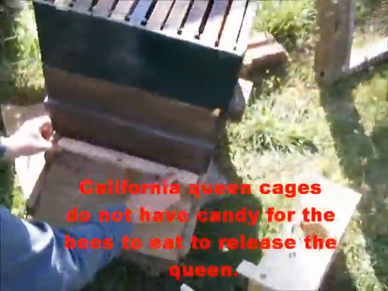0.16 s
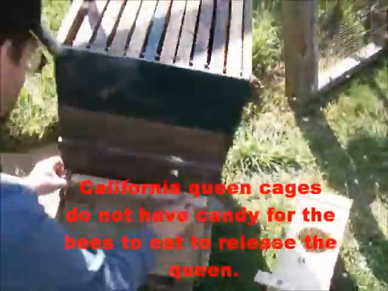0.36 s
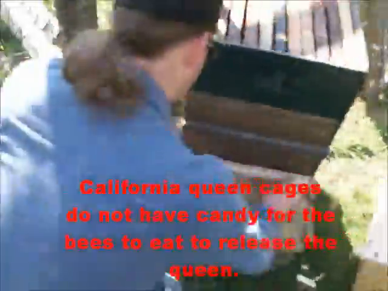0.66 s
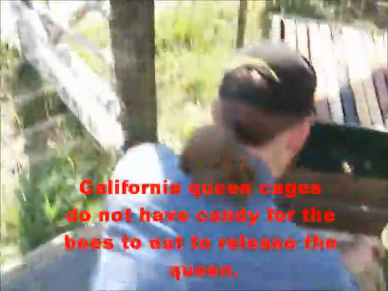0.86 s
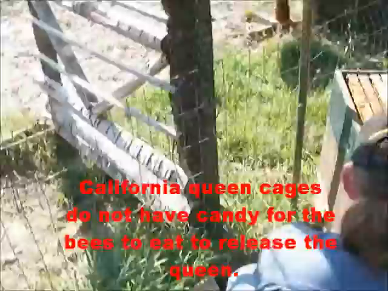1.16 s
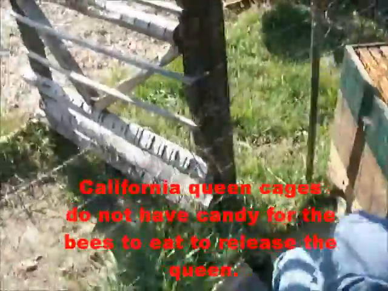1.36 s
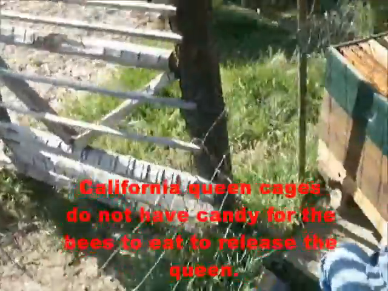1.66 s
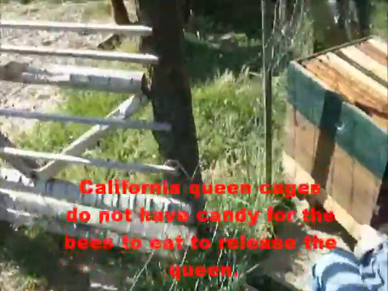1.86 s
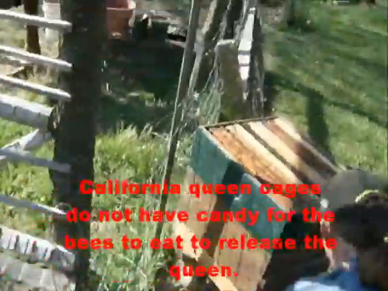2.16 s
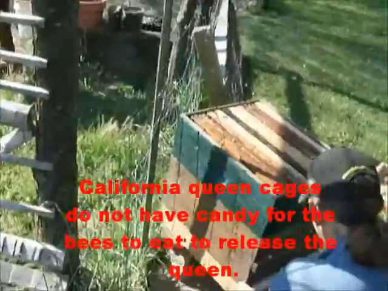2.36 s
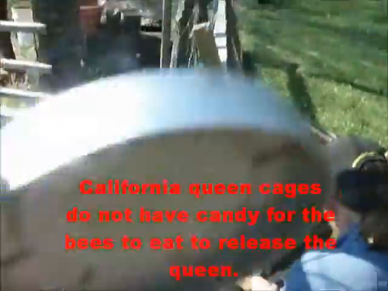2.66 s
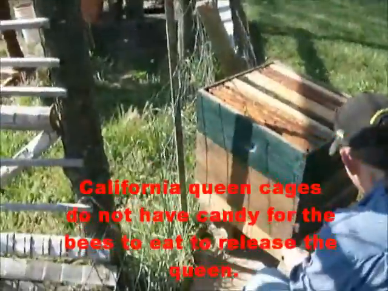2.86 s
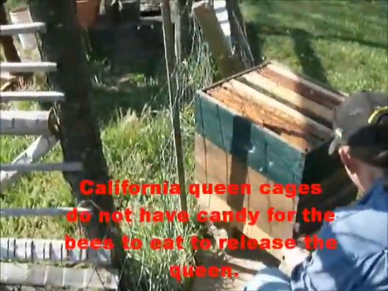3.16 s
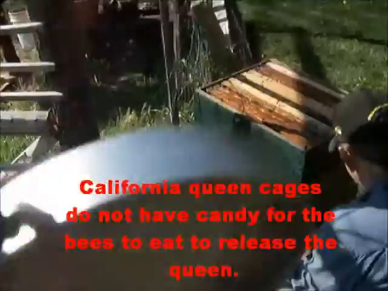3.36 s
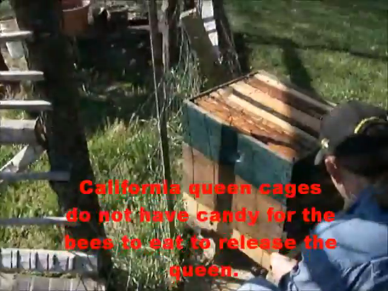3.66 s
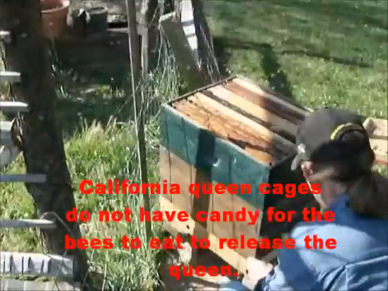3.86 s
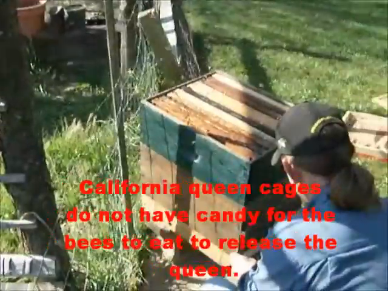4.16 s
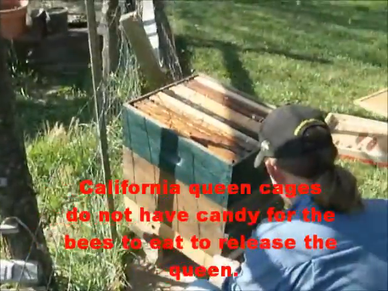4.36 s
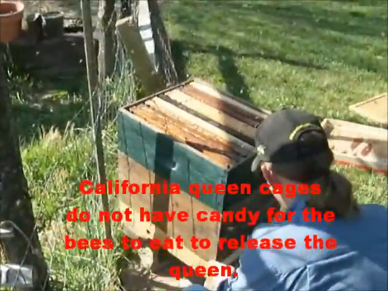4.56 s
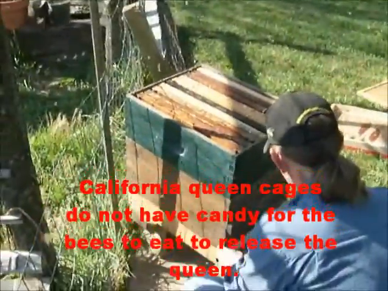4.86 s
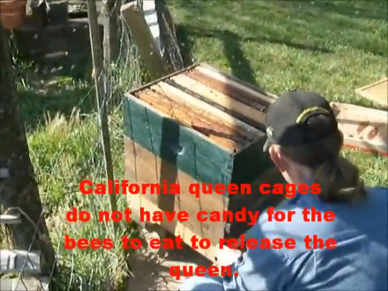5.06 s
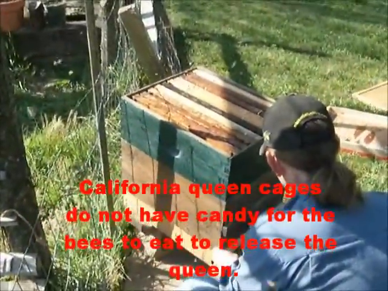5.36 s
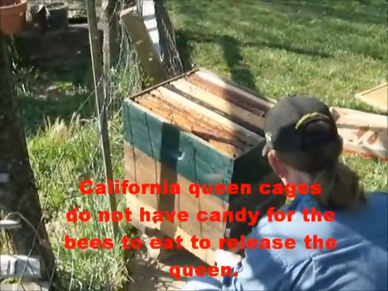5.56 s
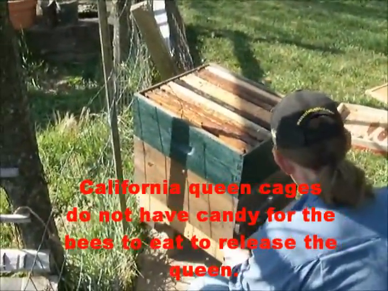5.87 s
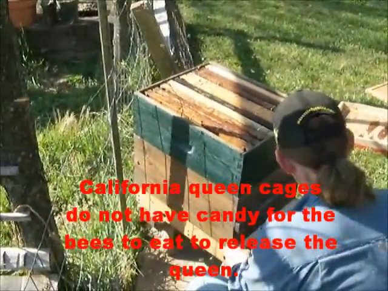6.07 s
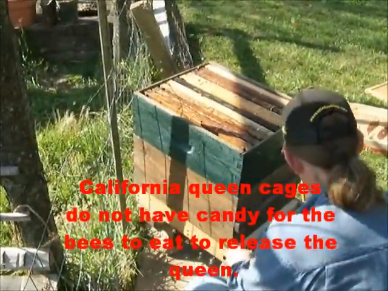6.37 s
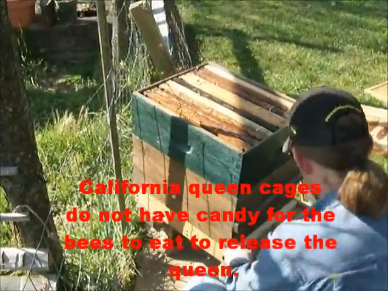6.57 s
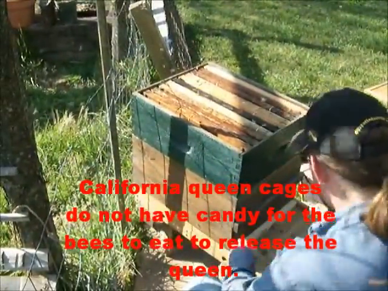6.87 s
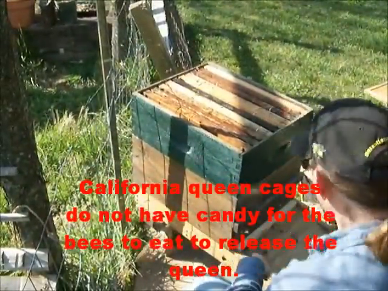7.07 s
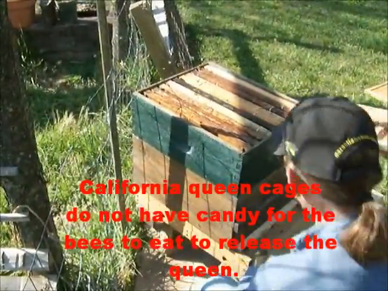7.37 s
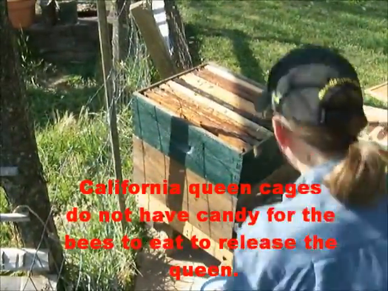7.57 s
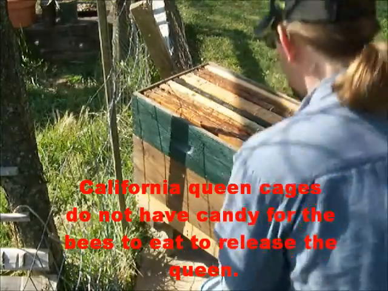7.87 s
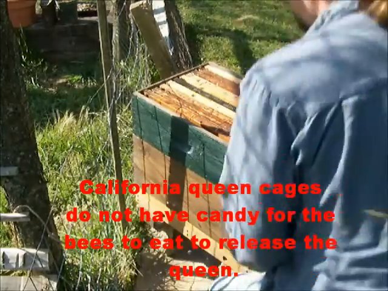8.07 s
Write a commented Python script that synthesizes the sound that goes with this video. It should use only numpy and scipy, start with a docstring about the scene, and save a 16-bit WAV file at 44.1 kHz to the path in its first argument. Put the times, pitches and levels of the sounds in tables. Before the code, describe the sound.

Close handling of a wooden beehive outdoors: a few soft taps, a hoarse board squeak, then hard hollow knocks, clicks and short scrapes in uneven bursts. Bees hum continuously around it, ducking under the recorder's automatic gain and swelling back once the knocking stops. Wind rumbles at the microphones, distant birds whistle and chirp, small hoarse pips sound on the left, and a low engine throbs far away.

```python
"""Open beehive at work

Many wingbeats blend into one drone at a wooden hive in a garden, with a far engine and far birds.
Struck parts ring damped modes, scrapes are gated noise, tones are glides, air and hiss are shaped noise.
The narrow-band recorder hisses on the right; its gain control ducks the hum after loud knocks."""
import sys
import numpy as np
from scipy import signal
from scipy.fft import rfft, irfft
from scipy.io import wavfile

SR = 44100
rng = np.random.default_rng(int(sys.argv[2]) if len(sys.argv) > 2 else 0)


def to_wav(s):
    """Save 16-bit WAV."""
    ch = np.atleast_2d(s).T  # columns
    pcm = np.round(np.clip(ch, -1, 1) * 32767)  # PCM
    wavfile.write(sys.argv[1], SR, pcm.astype(np.int16))


N = 362943
TIME = np.arange(N) / SR


def undb(db):
    """Decibels to gain."""
    return 10 ** (np.asarray(db) / 20)


def unit(x):
    """Scale to rms 1."""
    return x / np.sqrt(np.mean(x ** 2) + 1e-18)


def level_curve(table):
    """Gain at every sample from a table of (start_s, level_db)."""
    s, db = np.transpose(table)
    return undb(np.interp(TIME, s, db))


def walk(rate_hz):
    """Smooth random motion with a spread near 1."""
    knots = rng.standard_normal(int(N / SR * rate_hz) + 3)
    return 1.2 * np.interp(TIME * rate_hz + rng.random(), np.arange(len(knots)), knots)


def noise(colour, size=N, tilt_db=0):
    """Noise with a spectrum of (freq_hz, level_db) points, tilted per octave about 1.5 kHz."""
    hz, db = np.transpose(colour)
    f = np.maximum(np.fft.rfftfreq(size, 1 / SR), 1)
    shape_db = np.interp(np.log(f), np.log(hz), db) + tilt_db * np.log2(f / 1500)
    spectrum = rfft(rng.standard_normal(size)) * undb(shape_db) * (f < 2 * hz[-1])
    return unit(irfft(spectrum, size))


def stereo_noise(colour, size=N, tilt_db=0):
    """Independent noise at each microphone."""
    return np.array([noise(colour, size, tilt_db) for _ in range(2)])


def pan(db):
    """Equal-power left and right gains for a left minus right level."""
    return unit(undb(np.array([[db], [-db]]) / 2))


def add(out, s, sound):
    """Mix a sound in at a time."""
    i = max(int(s * SR), 0)
    out[:, i:i + sound.shape[-1]] += sound[..., :N - i]


def late(x, ms):
    """Delay a sound."""
    return np.interp(TIME - ms / 1000, TIME, x)


# hiss spectrum: freq_hz, level_db
HISS_COLOUR = [(200, -22), (900, -9.5), (2000, -9), (3100, -3), (3900, -4.5), (4600, -2), (5100, 2),
               (5600, -1), (6400, -7), (7400, -14.5), (9000, -32.5)]


def hiss():
    """Microphone self-noise, almost all on the right."""
    return noise(HISS_COLOUR) * undb(4.5) * pan(-35.5)


# outdoor murmur spectrum: freq_hz, level_db
GARDEN_COLOUR = [(40, -6.5), (130, 0.5), (300, -1), (480, 1.5), (640, -7.5), (1100, -7.5), (1400, -9.5),
                 (1900, -20), (3000, -22.5), (4000, -24), (7500, -29)]


def garden():
    """Grass and far insects; part is diffuse, part reaches the right microphone first."""
    shared = noise(GARDEN_COLOUR)
    diffuse = stereo_noise(GARDEN_COLOUR)
    murmur = np.array([late(shared, 0.18), shared]) + diffuse
    return unit(murmur) * undb(3.0 + 0.11 * walk(28.0))


# far engine: start_s, level_db (before the common background gain)
ENGINE_LEVEL = [(0, 2), (5, -7.5), (5.8, 9), (7.1, 10.5), (7.7, 6.5), (8.23, 0.5)]
# exhaust orders: multiple of the firing rate, level_db
EXHAUST_ORDERS = [(1, -6), (2, -16.5), (3, 1.5), (4, -2), (5, -8.5), (6, -17.5)]
FIRING_HZ = 30.5


def engine(wander_rad=0.72):
    """Low exhaust orders of a slow far engine, each wavering in level and phase on its way."""
    phase = 2 * np.pi * np.cumsum(FIRING_HZ * (1 + 0.011 * walk(12))) / SR
    throb = np.zeros(N)
    for multiple, db in EXHAUST_ORDERS:
        gain = undb(db + 3.5 * walk(9.7))
        offset = wander_rad * walk(25) + 2 * np.pi * rng.random()
        throb += gain * np.sin(multiple * phase + offset)
    return unit(np.array([late(throb, 0.81), throb])) * level_curve(ENGINE_LEVEL) * pan(3.3)


# air rumble at the ports: freq_hz, level_db
BUFFET_COLOUR = [(12, 2), (25, 4), (70, -3), (120, -7.5), (200, -19), (400, -41), (1000, -39.5)]
# gusts above the breeze: start_s, length_s, rise_db, left_minus_right_db
GUSTS = [(0.166, 0.86, 9.5, -7), (2.028, 0.86, 12, -6), (2.99, 3.04, 4, -2), (5.103, 2.02, 6.5, 5.5)]
BREEZE_DB = -27.5


def buffet(gust_edges=0.62):
    """Air rumbles independently at each microphone port and swells in gusts."""
    swell_db = np.zeros((2, N))
    for s, length_s, rise_db, side_db in GUSTS:
        ears_db = rise_db + np.array([[side_db], [-side_db]]) / 2
        add(swell_db, s, ears_db * signal.windows.tukey(int(length_s * SR), gust_edges))
    rumble = np.array([noise(BUFFET_COLOUR) * undb(2.2 * walk(7.4)) for _ in range(2)])
    return rumble * undb(BREEZE_DB + swell_db)


# hand friction spectrum: freq_hz, level_db
RUB_COLOUR = [(30, -23.5), (75, -14.5), (135, -1.5), (190, -12), (260, -14), (600, -24), (1500, -51.5)]
# hand shifting on the camera: start_s, length_s, level_db
RUBS = [(0.226, 0.18, -23.5), (7.5, 0.43, -30)]


def hand_rubs():
    """Skin friction on the camera body, mostly by the left microphone."""
    out = np.zeros((2, N))
    for s, length_s, db in RUBS:
        n = int(length_s * SR)
        rub = stereo_noise(RUB_COLOUR, n) * signal.windows.tukey(n, .5)
        add(out, s, rub * undb(db) * pan(17.0))
    return out


def tone(length_s, start_hz, end_hz, tremble, flutter_db):
    """A soft-edged glide that trembles in pitch and level."""
    n = int(length_s * SR)
    hz = np.linspace(start_hz, end_hz, n) * (1 + tremble * walk(200)[:n])
    wave = np.sin(2 * np.pi * np.cumsum(hz) / SR)
    return unit(wave * signal.windows.tukey(n, .7) * undb(flutter_db * walk(60)[:n]))


# far birds: start_s, length_s, start_hz, end_hz, level_db
WHISTLES = [(1.23, 0.1, 3190, 3000, -41.5), (1.8, 0.22, 3370, 3428, -37), (2.238, 0.11, 3290, 3260, -36),
            (2.44, 0.15, 3200, 3180, -39), (2.64, 0.13, 3150, 3100, -35.5), (2.91, 0.075, 3060, 3110, -40),
            (3.0, 0.11, 3020, 3120, -40), (3.14, 0.05, 3040, 3080, -39.5), (5.86, 0.24, 2780, 2830, -42.5),
            (6.3, 1.25, 3835, 3880, -45.5), (7.06, 0.13, 7350, 6600, -44), (7.325, 0.098, 3400, 4140, -40),
            (7.754, 0.13, 3160, 2940, -37), (7.849, 0.133, 2990, 2860, -43)]


def bird_whistles():
    """Thin gliding whistles of far birds on the right."""
    out = np.zeros((2, N))
    for s, length_s, start_hz, end_hz, db in WHISTLES:
        whistle = tone(length_s, start_hz, end_hz, tremble=.003, flutter_db=2.0)
        add(out, s, whistle * undb(db) * pan(-29.0))
    return out


# far bird: start_s, centre_hz, level_db
CHIRPS = [(3.6, 3750, -37.5), (3.664, 3720, -36), (3.68, 4430, -40.5), (3.73, 3740, -36),
          (3.799, 3780, -41), (3.882, 4450, -37.5), (3.943, 3730, -40)]


def bird_chirps(length_s=0.032, fall=0.04):
    """Quick notes of a far bird on the right, each gliding down."""
    out = np.zeros((2, N))
    for s, hz, db in CHIRPS:
        note = tone(length_s, hz * (1 + fall), hz * (1 - fall), tremble=.006, flutter_db=-1)
        add(out, s, note * undb(db) * pan(-20))
    return out


# short pips: start_s, level_db
PIPS = [(0.02, -41), (0.2, -34.5), (0.472, -41), (0.527, -38), (0.629, -37.5), (1.236, -36), (1.29, -30.5),
        (1.331, -34), (1.571, -34), (1.623, -34), (1.66, -36.5), (1.713, -36.5), (1.757, -36),
        (1.902, -40.5), (1.938, -35), (2.006, -30), (2.265, -32), (2.646, -35)]
PIP_S, PIP_HZ = 0.028, 1376


def hoarse_pips():
    """Quick runs of level-pitched pips on the left, made hoarse by pitch tremble."""
    out = np.zeros((2, N))
    for s, db in PIPS:
        pip = tone(PIP_S, PIP_HZ, PIP_HZ, tremble=0.021, flutter_db=2)
        add(out, s, pip * undb(db) * pan(13.0))
    return out


def bees(wing_hz, spread, harmonics, waver, swell_db, count):
    """Each bee has its own wingbeat, which wavers as it turns; it swells as it comes near."""
    cycle = np.arange(1024) / 1024
    out = np.zeros((2, N))
    for rank in np.linspace(-1, 1, count):
        wave = sum(undb(db) * np.sin(2 * np.pi * (multiple * cycle + rng.random()))
                   for multiple, db in harmonics)
        hz = wing_hz * (1 + spread * rank + waver * walk(4) + 0.005976 * walk(30))
        phase = np.cumsum(hz) / SR
        near = undb(swell_db * walk(1.806))
        # bearing sets the delay between the microphones
        lag_s = .00025 + .00025 * rng.standard_normal()
        for ear, turns in zip(out, (phase - lag_s * hz, phase)):
            ear += near * wave[(turns * len(cycle)).astype(int) % len(cycle)]
    return unit(out)


# whole swarm: start_s, level_db (added to the group gains)
SWARM_LEVEL = [(0, 0), (1.3, 1.5), (4.4, 2), (6.5, 3), (7.5, 1.5), (8.23, 3)]
# flying wingbeat: harmonic multiple, level_db
FLIGHT_HARMONICS = [(1, -3.5), (2, -3.5), (3, -11), (4, -11.5), (5, -13), (6, -20.5), (7, -26.5),
                    (8, -22.5), (9, -36.5), (10, -31.5), (11, -25.5), (12, -33)]
# fanning wingbeat: harmonic multiple, level_db
FANNING_HARMONICS = [(1, -12), (2, 2.5), (3, -1.5), (4, -15.5), (5, -10.5), (6, -4), (7, -10.5)]


def swarm():
    """Circling bees hold pitch better, darting ones bend it more; slower bees fan on the frames."""
    circling = bees(249.2, spread=.037, harmonics=FLIGHT_HARMONICS, waver=.029, swell_db=3.5, count=18)
    darting = bees(248.1, spread=.05, harmonics=FLIGHT_HARMONICS, waver=.05, swell_db=6, count=4)
    fanning = bees(170.7, spread=.07, harmonics=FANNING_HARMONICS, waver=.03, swell_db=4.5, count=8)
    hum = undb(0.37) * circling + undb(-6.0) * darting + undb(-4.0) * fanning
    return hum * level_curve(SWARM_LEVEL)


# single bees: nearest_s, near_time_s, wingbeat_hz, level_db (before the distance gain)
FLYBYS = [(7.37, 0.09, 245, -37.5), (7.98, 0.16, 243.4, -39)]


def flybys(doppler=0.012):
    """A passing bee swells as one over its distance; its pitch sags as it leaves."""
    out = np.zeros((2, N))
    for s, near_s, hz, db in FLYBYS:
        along = (TIME - s) / near_s
        distance = np.hypot(1, along)
        heard_hz = hz * (1 - doppler * along / distance)
        bee = bees(heard_hz, spread=0, harmonics=FLIGHT_HARMONICS, waver=.015, swell_db=1.5, count=1)
        out += bee * undb(db) / distance
    return out


# sliding board: start_s, length_s, lowest_hz, rise_fraction, level_db
SQUEAK = (0.86, 0.095, 720, 0.2, -33.5)


def squeak():
    """A sliding board sings hoarsely; pitch rises and falls with the speed of the push."""
    s, length_s, hz, rise, db = SQUEAK
    n = int(length_s * SR)
    speed = np.sin(np.pi * np.arange(n) / n)
    pitch_hz = hz * (1 + rise * speed + .06 * walk(500)[:n])
    wave = np.sin(2 * np.pi * np.cumsum(pitch_hz) / SR)
    out = np.zeros((2, N))
    add(out, s, unit(wave * np.sqrt(speed) * undb(2.6 * walk(150)[:n])) * undb(db))
    return out


# wood friction spectrum: freq_hz, level_db
SCRAPE_COLOUR = [(150, -26), (500, -4), (850, -1), (1450, 5), (1900, -4.5), (3500, -5.5), (5200, 1),
                 (7500, -10)]
# wood on wood: start_s, length_s, level_db, tilt_db_per_octave
SCRAPES = [(0.823, 0.14, -25.5, -3.5), (2.294, 0.068, -16, -6), (2.476, 0.06, -6.5, -6.5),
           (2.554, 0.056, -17.5, -5), (3.104, 0.039, -7.5, 1), (3.185, 0.028, -23.5, 4.5),
           (3.862, 0.12, -21.5, -5.5), (4.613, 0.0307, -13, -6.5), (5.121, 0.093, -27.5, -2.5),
           (5.439, 0.092, -26, -2.5), (5.568, 0.07, -15, -5), (5.67, 0.026, -25, 2)]


def scrapes(rough_db=2.5):
    """Wood catches and slips in a quick uneven run that builds until the part seats."""
    out = np.zeros((2, N))
    slips = undb(rough_db * walk(400))
    for s, length_s, db, tilt_db in SCRAPES:
        n, i = int(length_s * SR), int(s * SR)
        grain = stereo_noise(SCRAPE_COLOUR, n, tilt_db) * slips[i:i + n]
        build = np.linspace(.35, 1, n) * signal.windows.tukey(n, .12)
        # brighter scrapes lean right
        add(out, s, unit(grain * build) * undb(db) * pan(-tilt_db))
    return out


def blow_level(sound):
    """Scale to the energy of rms 1 over 20 ms."""
    return unit(sound) * np.sqrt(SR / 50 / sound.shape[-1])


def ring(push, modes, age_s, lag_cycles=0.26, uneven_db=3.0):
    """A push rings damped modes, which shift a little from one push to the next."""
    response = np.zeros((2, len(age_s)))
    for k, (hz, t60_s, db) in enumerate(modes):
        # heavily damped modes shift the most
        pitch_hz = hz + .5 * rng.standard_normal() / t60_s
        # each mode reaches the microphones unevenly and out of step
        since_s = np.maximum(age_s - np.array([[lag_cycles / hz], [0]]), 0)
        gain = undb(db + uneven_db * rng.standard_normal((2, 1)) - 60 * since_s / t60_s)
        response += (-1) ** k * gain * np.sin(2 * np.pi * pitch_hz * since_s)
    return blow_level(signal.fftconvolve(push[None], response, axes=1)[:, :len(age_s)])


# recorder filter rings near its cut-off after hard clicks: start_s, level_db
FILTER_RINGS = [(2.355, -13.5), (2.431, -17), (3.136, -23), (4.007, -23), (4.602, -20)]
# filter ring: freq_hz, t60_s, level_db
FILTER_RING_MODES = [(7420, 0.036, 0)]


def filter_rings():
    """The recorder's band limit rings briefly after a hard click, as one damped mode."""
    out = np.zeros((2, N))
    age_s = np.arange(SR // 6) / SR
    for s, db in FILTER_RINGS:
        add(out, s, ring(np.ones(1), FILTER_RING_MODES, age_s) * undb(db) * pan(-10))
    return out


# hive board modes: freq_hz, t60_s, level_db
BOARD_MODES = [(830, 0.021, 0), (1005, 0.013, 2.5), (1268, 0.026, -3), (1466, 0.013, 2.5),
               (1720, 0.005, -3), (2105, 0.0058, -1), (2376, 0.012, -4.5)]


def fidgets(level_db=-32, spread_db=3, count=26):
    """Fingers and loose parts tap faintly on the boards at random moments."""
    out = np.zeros((2, N))
    age_s = np.arange(SR // 16) / SR
    times_s = rng.uniform(3.7, 5.8, count)
    for s, size in zip(times_s, rng.standard_normal(count)):
        push = rng.standard_normal(len(age_s)) * np.exp(-age_s / 0.003)
        tap = ring(push, BOARD_MODES, age_s)
        add(out, s, tap * undb(level_db + spread_db * min(size, 1.5)) * pan(6.1))
    return out


# contact burst spectrum: freq_hz, level_db
CRACK_COLOUR = [(120, 0.5), (300, 2.5), (650, 0), (1200, 7), (2400, 2), (4000, -3.5), (5300, -9.5),
                (7500, -20.5)]


def crack(age_s, contact_ms, tilt_db, tail_ms=2.1):
    """The broad burst of the contact itself, dying within milliseconds."""
    decay = np.exp(-1000 * age_s / (contact_ms / 2 + tail_ms))
    return blow_level(noise(CRACK_COLOUR, len(age_s), tilt_db) * decay)


# low thud modes: freq_hz, t60_s, level_db
THUD_MODES = [(79, 0.13, -3.5), (122, 0.052, 3.5), (193, 0.016, 3), (283, 0.057, -7)]
# hollow box modes: freq_hz, t60_s, level_db
BOX_MODES = [(282, 0.051, -1), (354, 0.024, 1), (451.5, 0.037, 0.84), (550, 0.028, -2.3)]
# click modes: freq_hz, t60_s, level_db
CLICK_MODES = [(2300, 0.0037, -0.5), (2570, 0.0029, 2.5), (3270, 0.0054, -2), (3960, 0.0021, -6),
               (3930, 0.0046, -5), (5080, 0.0031, 3), (6100, 0.0037, -6), (6040, 0.0023, -2.5),
               (6900, 0.0082, -18)]
# blows: start_s, level_db, hardness_tilt_db_per_octave, thud_offset_db, box_offset_db,
# note_hz, note_offset_db, contact_ms, left_minus_right_offset_db
KNOCKS = [(0.41, -15.5, 2, 6.5, -1, 550, -1, 1.4, 3), (0.4496, -24, 3, 3, -8.5, 3300, 0.5, 0.81, -0.5),
          (0.758, -31.5, 0, 0, 2, 700, -8, 1.5, 3), (0.958, -24, 3.5, -4.5, -11, 2450, -2, 5.2, 4),
          (0.974, -30.5, 4, -8, -10, 4730, -6, 6, 7), (1.128, -30, -2.5, -5, -2, 885, -6, 1.5, -3),
          (1.167, -27.5, -4, -12, -3, 720, -1, 0.98, -1), (1.279, -30.5, -3, 4, -9, 800, -3, 2.8, -3),
          (1.4687, -31, -2, 4, 7, 265, 6, 0.6, -3), (2.0671, -12.5, -4, -3.5, 1, 625, -6.5, 2.6, 2),
          (2.2063, -7, -4, -3.5, -5, 896, -3, 2.4, 2.5), (2.355, -26.5, 13.5, -6, 6, 4900, 9, 1.7, 0),
          (2.402, -5.5, -4, -3.5, 3, 452, -5.5, 6.7, 4),
          (2.4289, -28.5, 14.5, -7, 13, 6600, 12.5, 4.5, 11.5), (2.532, -3.5, -3, -6, 1, 902, -4.5, 3.8, 3),
          (2.615, -23, 7.5, 12, 17, 456, -5.5, 1.1, 14), (2.696, -14.5, -1, -8.5, -9, 1400, -8, 1.4, 5.5),
          (3.3473, -15.5, -2, -4, 4, 440, -3, 3, 6), (3.3769, -19.5, -2.5, -4, 3, 420, -8, 0.9, -2),
          (3.4602, -20.5, -2.5, 4, -1, 905, -13, 3, -0.5),
          (3.6156, -14.5, -4.5, -12.5, -4, 442, 8.5, 4, 4.5), (3.7546, -17, -3, -9, 0, 1250, -7, 18, 4),
          (3.829, -16, 0, -3, 0, 1900, -6, 2.6, 4), (3.9799, -19, -1, -0.5, 8, 690, -1, 11, 9.5),
          (4.0061, -3, 3.5, 11.5, 4, 482, -3.5, 1.5, 6.5), (4.16, -27.5, -2, 6, -8.5, 1160, -4, 4.4, 1.5),
          (4.2146, -26.5, -6, -1.5, 3, 800, -3, 2.8, 7), (4.247, -25, -5, -5, 2.5, 1100, 0, 2.7, 1),
          (4.546, -22, -4.5, -12, -4, 1200, -3, 2, 2), (4.576, -17.5, -2.5, -9.5, 0, 800, -5, 1.8, 3),
          (4.6026, -9, 5.5, 20, 4.5, 290, -5, 0.88, 0), (4.729, -6.5, -2.5, -13.5, -13.5, 1006, -2, 4.8, 4),
          (4.8774, -9.5, -5, -17, -9, 1260, -1, 5.8, 5), (4.927, -1, -0.6, -7, -7, 1350, -2.5, 2.4, 4),
          (4.993, -23, -4, -15, -17.5, 1200, -4, 3.2, 1), (5.01, -20, -1, -3, -18.5, 1690, -6, 1.8, 6),
          (5.0524, -18.5, 1, -5, -17.5, 1260, -4, 2, 3), (5.189, -22.5, -3.5, -11, -8, 1300, -6, 4, 2),
          (5.219, -9.5, 5, -7, 5, 397, -5.5, 3, 3), (5.294, -23, -4.5, -5, 1.5, 268, 3, 3.7, 3),
          (5.344, -15.5, -1, -7, 0.5, 1510, -7, 4.3, 4), (5.404, -28, 4.5, -6, -15.5, 1210, 0, 2, 2),
          (5.544, -18, -7.5, -20, -7, 990, 1.5, 2.1, 0), (5.585, -17, -5, -10, -6, 875, 0, 3.6, 4),
          (5.593, -21, 8, 0, -6, 4700, 3, 0.9, -5), (5.624, -22, 4.5, 6, 0, 1015, -9, 6, -15),
          (5.6429, -0.5, -1.94, -11.5, -7.5, 2390, -10.5, 0.92, 3.5),
          (5.736, -26, -5.5, -2, -4, 1350, -1, 3.4, 7)]


def knocks(grit=0.12, bright_db=-9, scatter_db=-25, scatter_t60_s=0.17, note_cycles=20,
           thud_db=-4.5, box_db=-7, board_db=-4, click_db=-4, crack_db=-5):
    """A blow cracks and rings the struck piece, box and boards; soft ones thud, hard ones click."""
    out = np.zeros((2, N))
    age_s = np.arange(SR // 6) / SR
    for s, db, tilt_db, weight_db, hollow_db, note_hz, note_db, contact_ms, pan_db in KNOCKS:
        chatter = np.exp(-(1000 * age_s / max(contact_ms, .3)) ** 2 / 2)
        # ground and nearby boards scatter a short tail
        scatter = undb(scatter_db - 60 * age_s / scatter_t60_s)
        push = rng.standard_normal(len(age_s)) * grit * (chatter + scatter)
        push[0] += 1
        # the first impact alone sounds the struck piece's note
        note = ring(np.ones(1), [(note_hz, note_cycles / note_hz, 0)], age_s)
        add(out, s, note * undb(db + note_db) * pan(3.5 + pan_db))
        # harder blows favour the highest click modes
        click = [(hz, t60_s, gain_db + tilt_db * np.log2(hz / 4000)) for hz, t60_s, gain_db in CLICK_MODES]
        # modes, octaves above the boards, level_db, left_minus_right_db
        parts = ((THUD_MODES, -2.8, thud_db + weight_db, -10),
                 (BOX_MODES, -1.5, box_db + hollow_db, 2),
                 (BOARD_MODES, 0, board_db, 2),
                 (click, 2, click_db, bright_db))
        for modes, octaves, part_db, side_db in parts:
            part = ring(push, modes, age_s)
            add(out, s, part * undb(db + part_db + tilt_db * octaves) * pan(side_db + pan_db))
        add(out, s, crack(age_s, contact_ms, tilt_db) * undb(db + crack_db) * pan(pan_db))
    return out


BACKGROUND_DB = -35.0  # common gain of hiss, garden, engine and swarm


def scene():
    """Swarm, engine, garden and hiss lie under the close handling sounds."""
    background = (hiss() + garden() + engine() + swarm()) * undb(BACKGROUND_DB)
    air = buffet() + hand_rubs()
    calls = bird_whistles() + bird_chirps() + hoarse_pips()
    handling = fidgets() + squeak() + scrapes() + knocks()
    return background + air + calls + flybys() + handling + filter_rings()


# allowed level; margin below it within which sound renews the hold
CEILING_DB, RENEW_DB = -16, 6.5
DETECT_S, LAG_S, ATTACK_S, HOLD_S = 0.034, 0.014, 0.0059, 0.98
CREEP_DB_PER_S, RELEASE_DB_PER_S = 0.5, 12


def gain_control(x, block=88):
    """Loud sound turns the gain down; it creeps up during the hold, then climbs towards full."""
    step_s = block / SR
    blocks = x[:, :N // block * block].reshape(2, -1, block)
    power = np.mean(blocks ** 2, axis=(0, 2))
    window = np.clip(DETECT_S / step_s - np.arange(100), 0, 1)
    heard_db = 10 * np.log10(signal.lfilter(window / window.sum(), 1, power) + 1e-12)
    aim_db, gain_db, quiet_s, gains_db = 0, 0, np.inf, []
    for db in heard_db:
        quiet_s = 0 if db + aim_db > CEILING_DB - RENEW_DB else quiet_s + step_s
        rise_db_per_s = CREEP_DB_PER_S if quiet_s < HOLD_S else RELEASE_DB_PER_S
        aim_db = min(aim_db + rise_db_per_s * step_s, CEILING_DB - db, 0)
        gain_db += (aim_db - gain_db) * (1 - np.exp(-step_s / ATTACK_S))
        gains_db.append(gain_db)
    return x * undb(np.interp(TIME, np.arange(len(gains_db)) * step_s + LAG_S, gains_db))


BAND_HZ, TOP_HZ = 7750, 16000


def record(dry):
    """A steep band limit rings on clicks; gain control follows, quick peaks clip, the top is cut."""
    band_limit = signal.ellip(10, .3, 70, BAND_HZ, fs=SR, output="sos")
    top_limit = signal.ellip(8, .2, 70, TOP_HZ, fs=SR, output="sos")
    narrow = signal.sosfilt(band_limit, dry)
    clipped = np.clip(gain_control(narrow), -1, 1)
    return signal.sosfilt(top_limit, clipped)


dry = scene()
out = record(dry)
to_wav(out)
```